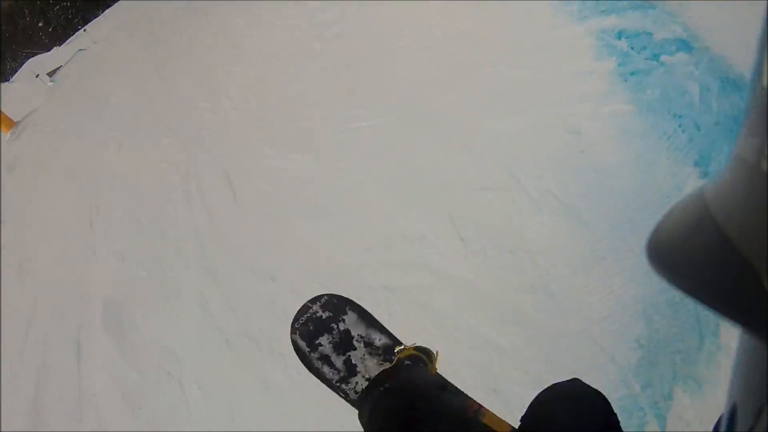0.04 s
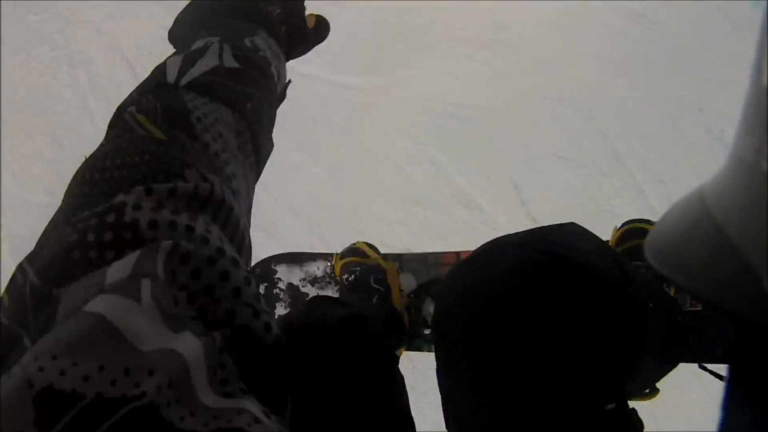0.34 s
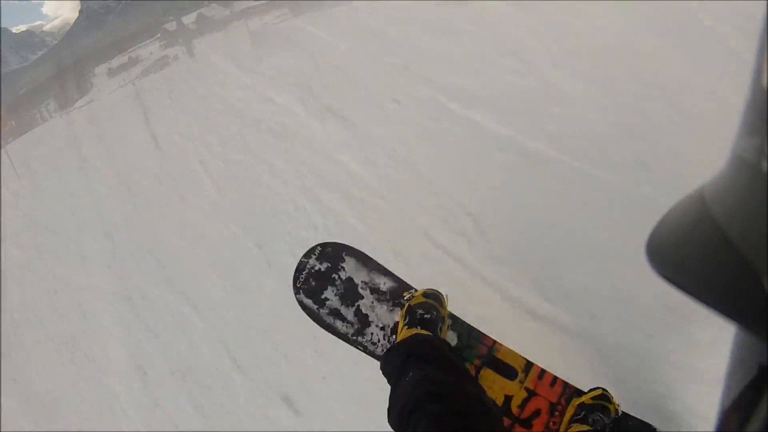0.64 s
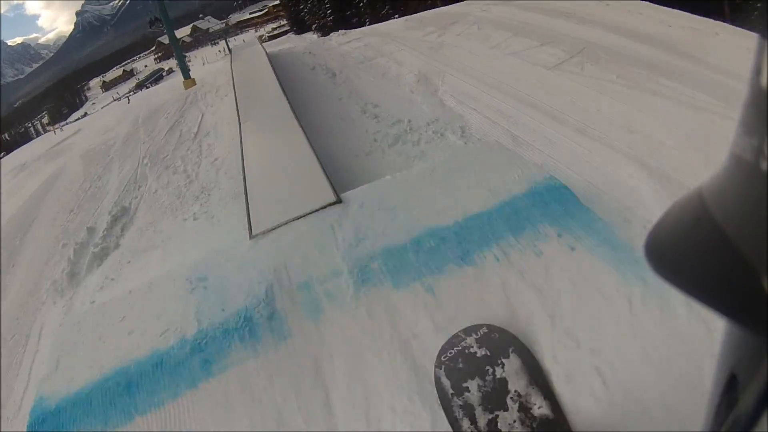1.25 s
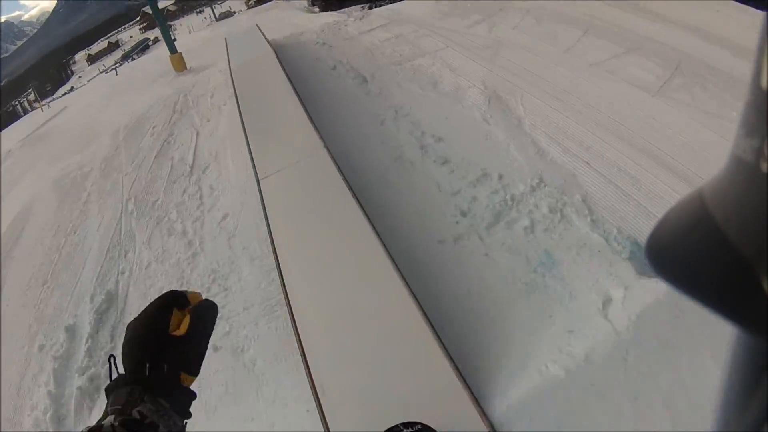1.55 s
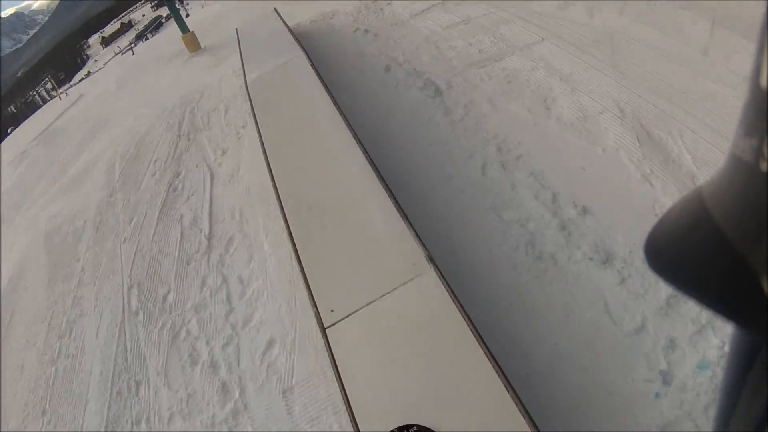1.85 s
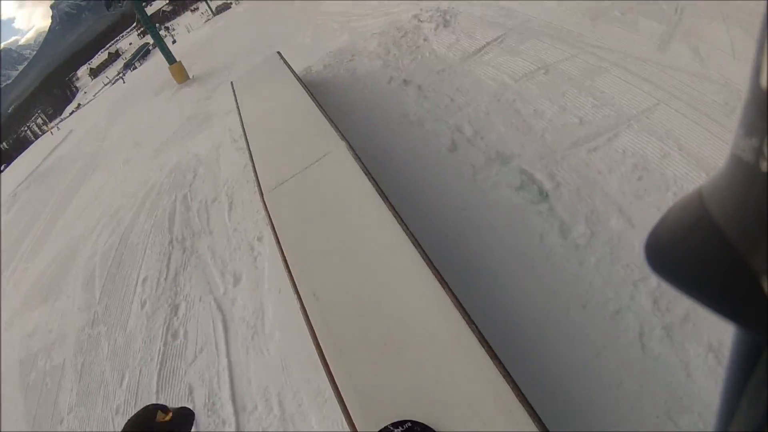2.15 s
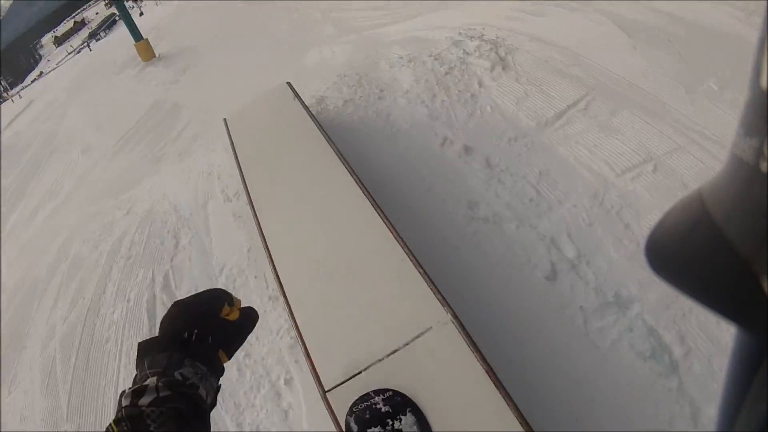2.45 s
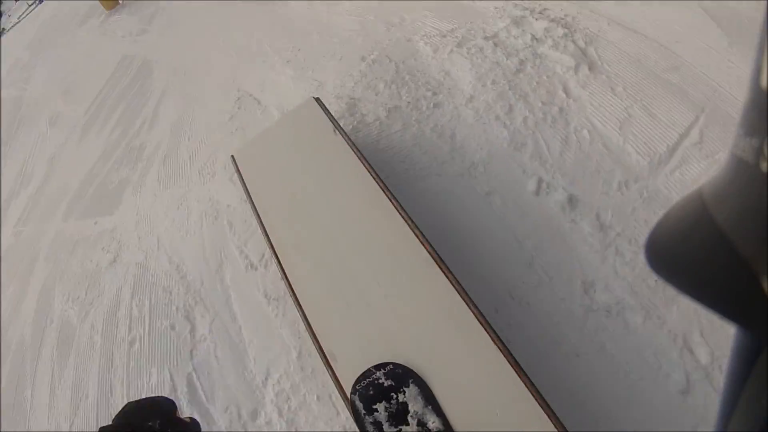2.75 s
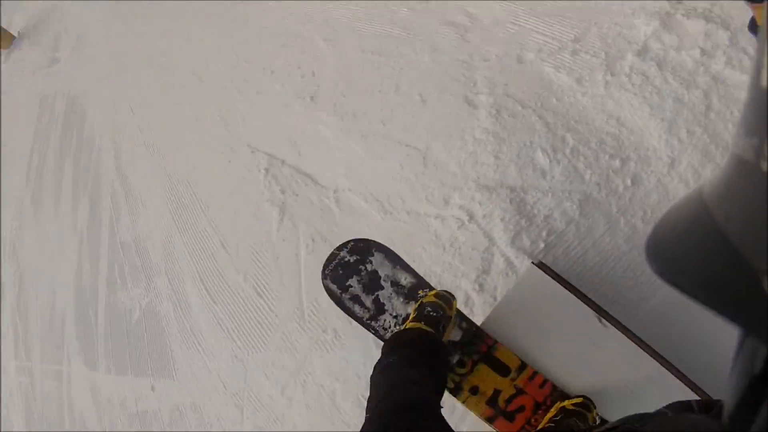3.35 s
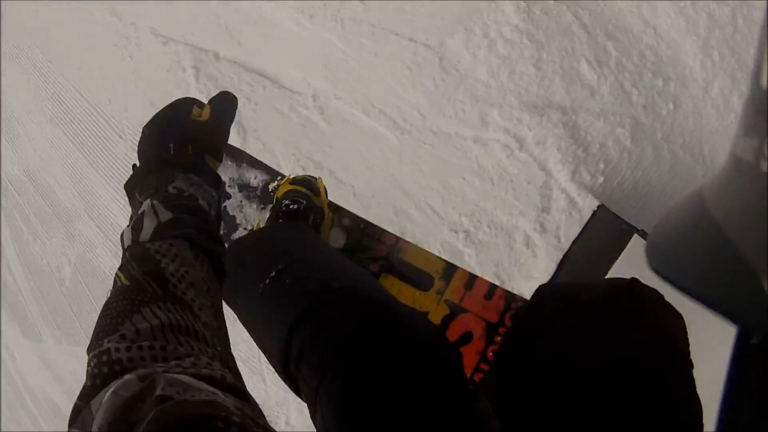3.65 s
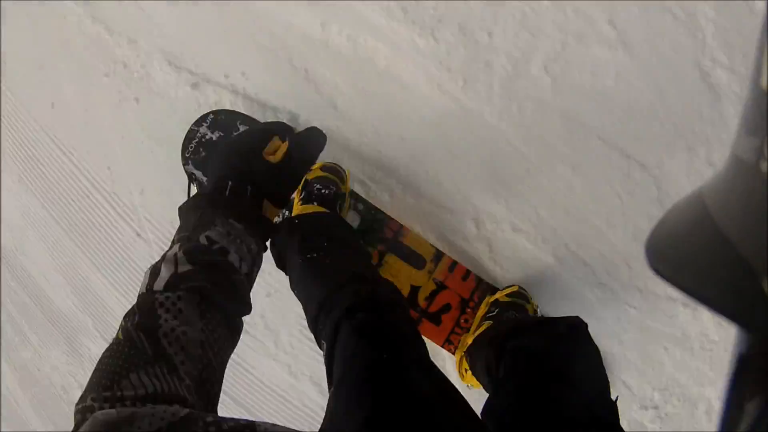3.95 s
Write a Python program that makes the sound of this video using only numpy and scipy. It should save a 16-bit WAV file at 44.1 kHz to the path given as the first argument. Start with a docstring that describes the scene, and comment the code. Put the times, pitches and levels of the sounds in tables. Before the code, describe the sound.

A snowboard rumbles and crunches up a snowy ramp, knocks onto a plastic box and slides with a hollow scrape. Clothing rustles in the jump, then comes a sharp snap. Wind buffets the microphone on the rider.

```python
"""A snowboard run, heard from a camera on the rider, with wind buffeting the microphone throughout.
First the board rumbles and knocks up a ramp, crunching the snow, and its edge sings on the lip.
Near 1.8 s it knocks onto a plastic box and slides along it, scraping, hissing and ringing hollow.
Near 3.4 s it flies off the end, and clothing rustles during the jump.
Last, at 3.9 s, a hard double snap sounds close by."""
import sys
import numpy as np
from scipy import signal
from scipy.fft import rfft, irfft
from scipy.io import wavfile
from scipy.ndimage import uniform_filter1d

SR = 44100
rng = np.random.default_rng(int(sys.argv[2]) if len(sys.argv) > 2 else 0)


def int16_out(signal):
    """Quantize to a 16-bit WAV file."""
    q = np.round(np.clip(np.atleast_2d(signal).T, -1, 1) * 32767)
    wavfile.write(sys.argv[1], SR, q.astype(np.int16))


N = 4 * SR

# spectrum of breaking packed snow: frequency_hz, relative_db
CRUNCH_SPECTRUM = [(150, -14.5), (350, 0), (520, 3.5), (680, 1.5), (810, 2), (1000, -1.5), (1250, -4),
                   (1600, -6), (2000, -11), (2600, -18), (4000, -35), (6000, -39.5), (15000, -76)]
# spectrum of icy grit: frequency_hz, relative_db
GRIT_SPECTRUM = [(1000, -13), (2500, 2.5), (4300, -3), (5500, -6.5), (8200, -3.5), (11000, -12), (13300, 0),
                 (16000, -13)]
# spectrum of flying snow: frequency_hz, relative_db
SPRAY_SPECTRUM = [(1000, 2), (3000, -2), (5000, -10), (6800, -7), (8200, -2), (10000, -5), (12000, -7.5),
                  (13300, -0.5), (14400, -9.5), (16000, -15)]


def undb(db):
    """Decibels to amplitude ratio."""
    return 10 ** (np.asarray(db) / 20)


def unit(x):
    """Normalisation to rms 1."""
    return x / np.sqrt(np.mean(x ** 2))


def envelope(curve):
    """Gain along (time_s, level_db) points; silent outside, but held if within 0.1 s of either end."""
    times, db = np.array(curve).T
    before_db = db[0] if times[0] < .1 else -120
    after_db = db[-1] if times[-1] > 3.9 else -120
    return undb(np.interp(np.arange(N) / SR, times, db, left=before_db, right=after_db))


def response(spectrum, size=4096):
    """Minimum-phase impulse response of a spectrum, by folding its cepstrum."""
    hz, db = np.array(spectrum).T
    bins_hz = np.maximum(np.fft.rfftfreq(size, 1 / SR), 1)
    magnitude = undb(np.interp(np.log(bins_hz), np.log(hz), db))
    cepstrum = irfft(np.log(magnitude))
    cepstrum[1:size // 2] *= 2
    cepstrum[size // 2 + 1:] = 0
    return irfft(np.exp(rfft(cepstrum)))


def colour(excitation, spectrum):
    """Source and filter: an excitation shaped by a spectrum, at rms 1."""
    return unit(signal.fftconvolve(excitation, response(spectrum))[:N])


def wander(rate_hz):
    """Smoothed random steps at rms 1."""
    hold = max(int(SR / rate_hz), 2)
    steps = np.repeat(rng.standard_normal(N // hold + 1), hold)[:N]
    return unit(uniform_filter1d(uniform_filter1d(steps, hold), hold))


def flutter(rate_hz, depth_db):
    """Random amplitude modulation at rms 1."""
    return unit(undb(depth_db * wander(rate_hz)))


def grains(per_s, spread_db):
    """Shot noise: independent tiny impulses of uneven size."""
    occurs = rng.random(N) < per_s / SR
    polarity = np.sign(rng.standard_normal(N))
    strength = undb(spread_db * np.minimum(rng.exponential(size=N), 4))
    return unit(occurs * polarity * strength)


def resonance(pitch_hz, width_hz):
    """A mode driven by random friction gives a narrow band of noise around its pitch."""
    drive = rng.standard_normal(N) + 1j * rng.standard_normal(N)
    amplitude = signal.sosfilt(signal.butter(2, width_hz / 2, fs=SR, output="sos"), drive)
    phase = 2 * np.pi * np.cumsum(pitch_hz * np.ones(N)) / SR
    return unit(np.real(amplitude * np.exp(1j * phase)))


def pulse(length_s, size):
    """One raised-cosine swell, followed by silence."""
    t = np.arange(size) / SR
    return np.sin(np.pi * np.minimum(t / length_s, 1)) ** 2


def shower(length_s, spectrum, size=4096):
    """Many fine fractures merge into a short swell of filtered noise."""
    return signal.fftconvolve(rng.standard_normal(size) * pulse(length_s, size), response(spectrum))


def crack(spectrum, tail_s, tail_db, size=1024):
    """Hard contact: an impulse and its exponentially decaying chatter excite a filter."""
    force = undb(tail_db) * rng.standard_normal(size) * np.exp(-np.arange(size) / SR / tail_s)
    force[0] = 1
    return signal.fftconvolve(force, response(spectrum))


def add(out, start_s, sound, peak_db):
    """Superposition: mix in a sound at a given time and peak level."""
    start = int(start_s * SR)
    out[start:start + len(sound)] += (sound * undb(peak_db) / np.abs(sound).max())[:N - start]


def wind():
    """Turbulence: eddies vary the pressure on the microphone; single gusts and jolts thump."""
    # wind pressure: time_s, relative_db
    pressure = [(0, -49.5), (.2, -43.5), (.38, -45), (.44, -33), (.48, -39), (.93, -40.5), (.99, -32),
                (1.3, -36.5), (1.68, -37.5), (1.75, -32), (1.86, -38), (1.94, -36), (2.02, -40),
                (2.49, -41), (2.56, -55.5), (2.75, -48.5), (2.86, -53), (2.95, -44), (3.15, -42.5),
                (3.33, -69), (3.45, -49.5), (3.65, -53.5), (3.9, -46.5), (4, -59)]
    # spectrum of the eddies: frequency_hz, relative_db
    spectrum = [(15, -7), (30, -3.5), (50, -4), (100, -2.5), (150, -7.5), (300, -37.5), (800, -38.5),
                (3000, -85)]
    # gusts and jolts: centre_s, width_s, peak_db
    thumps = [(.4, 0.002, -23), (0.428, 0.0037, -21), (0.448, 0.0036, -21), (.988, 0.00045, -11),
              (1.751, 0.0037, -24), (1.9363, 0.0045, -19)]
    out = colour(rng.standard_normal(N), spectrum) * flutter(18, depth_db=.5) * envelope(pressure) * undb(3)
    for centre_s, width_s, peak_db in thumps:
        half = int(4 * width_s * SR)
        widths = np.arange(-half, half) / SR / width_s
        ricker_wavelet = (widths ** 2 - 1) * np.exp(-widths ** 2 / 2)
        add(out, centre_s - half / SR, ricker_wavelet, peak_db)
    return out


def clothing():
    """Buckling: stiff fabric crinkles in tiny impulses as the rider tucks."""
    # rustle in the jump: time_s, level_db
    rustle = [(3.37, -74), (3.43, -52.5), (3.49, -59), (3.517, -47.5), (3.53, -51), (3.57, -56.5),
              (3.68, -57), (3.745, -48.5), (3.81, -45.5), (3.85, -57.5), (3.89, -50.5), (3.92, -57.5),
              (4, -57.5)]
    # spectrum of the fabric: frequency_hz, relative_db
    spectrum = [(200, -2), (450, -0.5), (680, -4), (820, -1.5), (1050, -1.5), (1800, -3.5), (2400, -12),
                (3200, -18), (4500, -26.5), (12000, -28)]
    return colour(grains(1200, spread_db=1), spectrum) * flutter(130, depth_db=3) * envelope(rustle)


def rumble():
    """Structure-borne sound: bumps under the board shake rider and camera."""
    # strength of the shaking: time_s, relative_db
    shaking = [(0, -37.5), (.13, -49), (.24, -38.5), (.36, -45), (.43, -36), (.5, -46), (.57, -39.5),
               (.6, -38.5), (.83, -35.5), (.97, -29.5), (1.05, -32), (1.27, -25.5), (1.48, -32.5),
               (1.65, -30.5), (1.88, -25.5), (2, -44), (2.36, -37), (2.49, -43), (2.57, -57.5),
               (2.82, -51.5), (2.97, -44.5), (3.15, -47.5), (3.27, -68), (3.4, -64), (3.46, -58),
               (3.68, -57), (3.89, -45.5), (3.93, -66), (4, -65)]
    # spectrum of the shaking: frequency_hz, relative_db
    spectrum = [(40, -28.5), (90, -9), (135, -0.5), (240, -.5), (350, -5), (480, -11.5), (800, -22.5),
                (3000, -92)]
    vibration = colour(grains(1500, spread_db=2.5), spectrum)
    return vibration * flutter(30.01, depth_db=1.6) * envelope(shaking) * undb(1)


def ticks():
    """Brief contacts of bindings and ice radiate broadband clicks."""
    # contacts: start_s, peak_db
    contacts = [(.221, -35), (0.489, -25), (.578, -36), (.687, -40), (.9878, -31), (2.044, -30),
                (3.472, -39), (3.514, -35), (3.539, -39), (3.756, -41), (3.831, -37), (3.862, -34)]
    # spectrum of a tick: frequency_hz, relative_db
    spectrum = [(500, -20), (1500, 2), (2900, 0), (4500, -9), (8200, -5), (11000, -7), (13300, -9),
                (16000, -11)]
    out = np.zeros(N)
    for start_s, peak_db in contacts:
        add(out, start_s, crack(spectrum, tail_s=.00045, tail_db=-10), peak_db)
    return out


def knocks(contact_s=.00024, detune=.038, size=6000):
    """Modal decay: cushioned blows excite the damped modes of board and camera housing."""
    # modes: frequency_hz, relative_db, t60_s
    modes = [(375, -6, 0.054), (801, 1, 0.024), (1122, -2.5, 0.027), (1456, -1.5, 0.015), (1700, 0, 0.0084),
             (1915, -14, 0.03), (2336, -23, 0.0163)]
    # blows to the board: start_s, peak_db
    blows = [(.187, -30), (.222, -24.5), (.408, -27.5), (.521, -29), (.579, -29), (.771, -24.5),
             (.9886, -16), (1.839, -18), (2.043, -28), (2.183, -26), (2.8744, -24), (2.877, -32),
             (3.541, -33.5), (3.74, -31), (3.757, -36), (3.822, -28.5), (3.862, -36), (3.890, -34.5)]
    t = np.arange(size) / SR
    out = np.zeros(N)
    for start_s, peak_db in blows:
        ringing = np.zeros(size)
        for hz, db, t60_s in modes:
            pitch_hz = hz * (1 + detune * rng.standard_normal())
            ringing += undb(db) * np.sin(2 * np.pi * pitch_hz * t) * np.exp(-np.log(1000) * t / t60_s)
        add(out, start_s, signal.fftconvolve(ringing, pulse(contact_s, size))[:size], peak_db)
    return out


def edge(width_hz=65, overtone_hz=2735):
    """Friction-driven resonance: the steel edge sings, falling in pitch as the board unloads."""
    # tone on the lip of the ramp: time_s, pitch_hz, level_db
    tone = [(1.31, 1293, -54), (1.345, 1124, -35), (1.39, 928, -47), (1.45, 892, -38.5), (1.51, 905, -44),
            (1.55, 872, -58)]
    times, hz, db = np.array(tone).T
    pitch_hz = np.interp(np.arange(N) / SR, times, hz)
    overtone_gain = undb(-14.5) * (hz.min() / pitch_hz) ** 8  # grows as the pitch settles
    singing = resonance(pitch_hz, width_hz) + overtone_gain * resonance(overtone_hz, width_hz)
    return singing * envelope(np.column_stack([times, db]))


def box_scrape():
    """Stick-slip friction: the base catches on the plastic and lets go."""
    # pressure of the base on the box: time_s, relative_db
    pressure = [(1.82, -66), (1.92, -41), (2.032, -51), (2.05, -37.5), (2.085, -45), (2.17, -54.5),
                (2.19, -46.5), (2.4, -53), (2.56, -53), (2.72, -60), (2.77, -58.5), (2.86, -68), (2.9, -56),
                (3.18, -60.5), (3.31, -53.5), (3.39, -62), (3.5, -54)]
    # spectrum of the scrape: frequency_hz, relative_db
    spectrum = [(200, -6.5), (500, -5), (700, -4.5), (1100, -1), (1500, 1.5), (1900, -2), (2300, -8.5),
                (3100, -10.5), (4000, -19), (8000, -29)]
    slips = colour(grains(4000, spread_db=.5), spectrum)
    return slips * flutter(45.02, depth_db=1.5) * envelope(pressure) * undb(-1)


def box_ring(drift=.04):
    """Forced vibration: the board rings hollow on the box, its modes drifting as the weight shifts."""
    # modes of the board on the box: frequency_hz, width_hz, relative_db
    modes = [(872, 180, 3.5), (1806, 180, -4), (2600, 160, -12.5)]
    # strength of the ringing: time_s, relative_db
    strength = [(1.85, -57), (1.93, -42), (2.01, -49.5), (2.13, -51), (2.35, -52), (2.56, -62),
                (2.84, -65.5), (2.95, -58), (3.3, -54), (3.4, -70)]
    ringing = sum(undb(db) * resonance(hz * (1 + drift * wander(12)), width) for hz, width, db in modes)
    return unit(ringing) * flutter(29.95, depth_db=2.5) * envelope(strength) * undb(-1)


def base_hiss():
    """Roughness noise: dense tiny contacts of the sliding base merge into an uneven hiss."""
    # glide on hard ground: time_s, relative_db
    glide = [(1.2, -66), (1.8, -60.5), (1.85, -47), (1.97, -50), (2.01, -52), (2.07, -50.5), (2.15, -57),
             (2.24, -53.5), (2.31, -52.5), (2.35, -60.5), (2.44, -54.5), (2.48, -58.5), (2.54, -56.5),
             (2.72, -58), (2.775, -73), (2.87, -71), (2.92, -60), (3.03, -53.5), (3.11, -60.5),
             (3.18, -54.5), (3.31, -63), (3.39, -65), (3.47, -76)]
    # spectrum of the hiss: frequency_hz, relative_db
    spectrum = [(1500, -1), (3200, -2), (4300, -8), (5400, -8), (6100, -2.5), (6900, -3.5), (8100, 3),
                (9800, -4), (11800, -8), (13300, -5), (14500, -18), (16000, -26)]
    hiss = colour(grains(14000, spread_db=2.5), spectrum)
    return hiss * flutter(130, depth_db=1.5) * flutter(28.07, depth_db=1.1) * envelope(glide) * undb(.5)


def snow():
    """Granular fracture: packed snow breaks under the board, crackles with grit and sprays away."""
    # bite of the board in the snow: time_s, relative_db
    bite = [(0, -44), (.055, -46.5), (.072, -57.5), (.2, -46.5), (.255, -50), (.298, -43.5), (.335, -49.5),
            (.37, -51), (.44, -44.5), (.48, -53), (.572, -60), (.584, -43), (.82, -44.5), (.92, -33),
            (1.04, -38), (1.1, -34), (1.27, -35.5), (1.38, -37.5), (1.53, -39.5), (1.67, -37.5),
            (1.73, -34), (1.905, -29), (1.93, -53), (2.02, -69)]
    # snow spray and rushing air: time_s, relative_db
    rush = [(0, -62), (.16, -63.5), (.33, -55), (.42, -60.5), (.56, -68), (.6, -63.5), (.87, -60),
            (.93, -55.5), (1.02, -53), (1.4, -55), (1.58, -54.5), (1.77, -68), (2.3, -64), (2.82, -71.5),
            (3.3, -63), (3.41, -55.5), (3.46, -62), (3.62, -63.5), (3.68, -58), (3.75, -64), (3.86, -61.5),
            (3.93, -70.5), (4, -68)]
    crunch = colour(grains(5000, spread_db=1.7), CRUNCH_SPECTRUM) * flutter(69.9, depth_db=1.13)
    grit = colour(grains(260, spread_db=2.5), GRIT_SPECTRUM)
    spray = colour(grains(16000, spread_db=2), SPRAY_SPECTRUM) * flutter(160, depth_db=.97)
    breaking = crunch * undb(2.5) + grit * undb(-26.5)
    return breaking * envelope(bite) + spray * envelope(rush) * undb(3.5)


def ice():
    """Brittle fracture: crusts break under the edge, and ice crystals fly in short spurts."""
    # breaking crusts: centre_s, length_s, crunch_peak_db, grit_peak_db
    crusts = [(.052, .02, -33.5, -56), (.29, .05, -28, -52), (0.309, .03, -28.5, -50),
              (0.912, .02, -31, -41), (0.979, .008, -21, -40), (.994, .014, -18, -40),
              (1.051, .01, -27, -40), (1.091, .02, -21, -42), (1.104, .012, -21.5, -38),
              (1.245, .026, -23.5, -45), (2.05, .016, -31.5, -41), (2.114, .01, -32.5, -47),
              (2.241, 0.029, -34, -44)]
    # spurts of crystals: centre_s, length_s, peak_db
    spurts = [(0.984, 0.0095, -32), (.9885, 0.0045, -25.5), (0.993, 0.004, -27), (1.017, .016, -34.5),
              (2.062, 0.051, -44), (3.514, .012, -42), (3.538, 0.0087, -44), (3.588, .016, -43),
              (3.599, 0.007, -45)]
    out = np.zeros(N)
    for centre_s, length_s, crunch_db, grit_db in crusts:
        add(out, centre_s - length_s / 2, shower(length_s, CRUNCH_SPECTRUM), crunch_db)
        add(out, centre_s - length_s / 2, shower(length_s, GRIT_SPECTRUM), grit_db)
    for centre_s, length_s, peak_db in spurts:
        add(out, centre_s - length_s / 2, shower(length_s, SPRAY_SPECTRUM), peak_db)
    return out


def snap():
    """Impact: two hard contacts beside the microphone, the second exciting the body of the part."""
    # contacts: start_s, peak_db
    contacts = [(3.9046, -4), (3.9064, -2)]
    # spectrum of a contact: frequency_hz, relative_db
    contact_spectrum = [(300, -38), (1000, -26), (1600, -6.5), (2500, -8.5), (3400, -18), (4300, -6),
                        (5400, -2), (6500, -6), (7500, 4), (8800, 5), (9900, 3.5), (11200, -18), (13300, 1),
                        (15000, -10.5), (18000, -31)]
    # body of the snapping part: frequency_hz, relative_db
    body_spectrum = [(500, -24), (1000, -8), (1600, -1.5), (2500, 5), (4200, -1), (6000, -6), (9000, -10),
                     (16000, -38)]
    out = np.zeros(N)
    for start_s, peak_db in contacts:
        add(out, start_s, crack(contact_spectrum, tail_s=.00074, tail_db=-23.5), peak_db)
    add(out, contacts[-1][0], crack(body_spectrum, tail_s=.0018, tail_db=-2), peak_db=-18.5)
    return out


def scene():
    """Superposition: the pressures of all sources add at one microphone."""
    ride = wind() + rumble() + snow() + edge() + box_scrape() + box_ring() + base_hiss()
    return (ride + clothing() + knocks() + ticks() + snap() + ice())[None]


def record(dry):
    """Band limiting: the camera's steep low-pass filter removes the highest treble."""
    cutoff_hz = 15300
    return signal.sosfilt(signal.ellip(8, .2, 70, cutoff_hz, fs=SR, output="sos"), dry)


dry = scene()
out = record(dry)
int16_out(out)
```